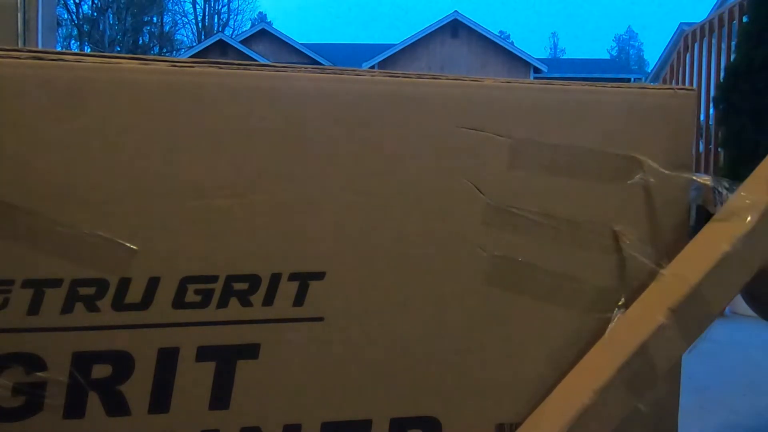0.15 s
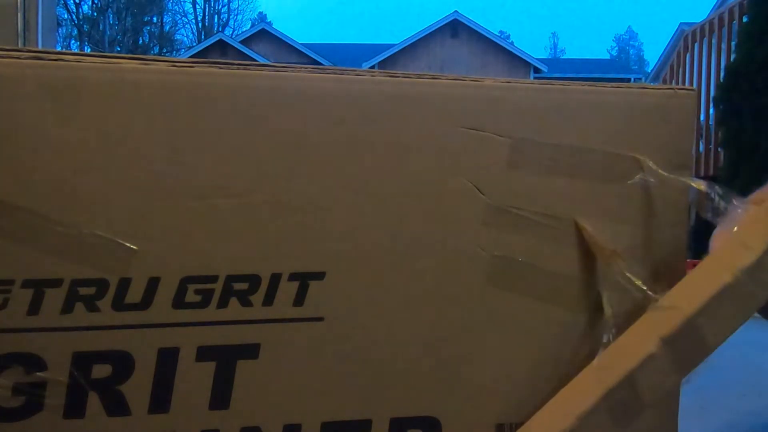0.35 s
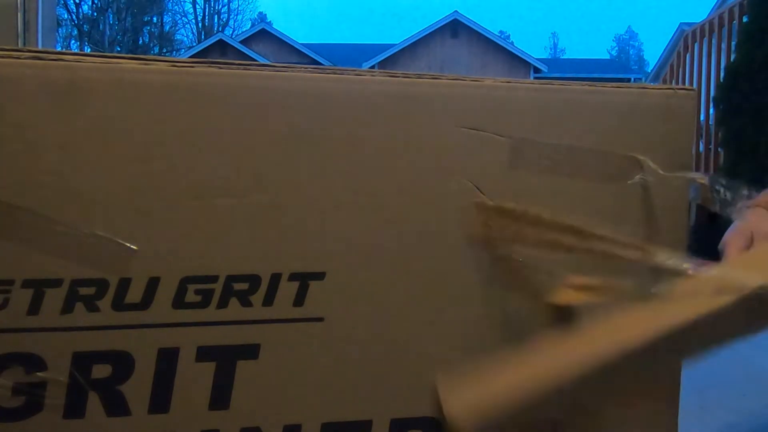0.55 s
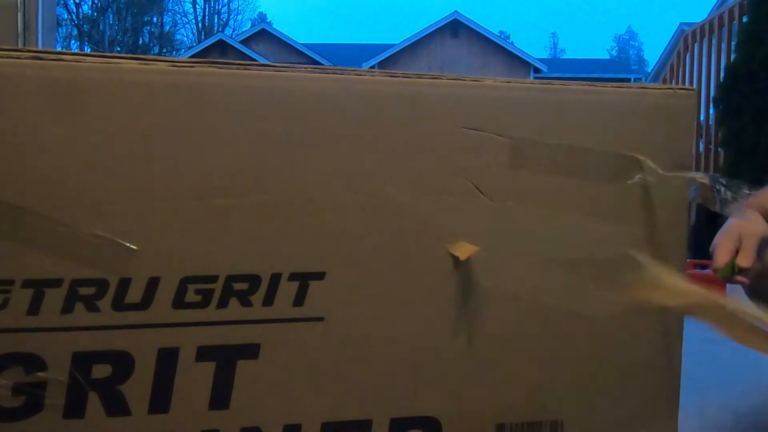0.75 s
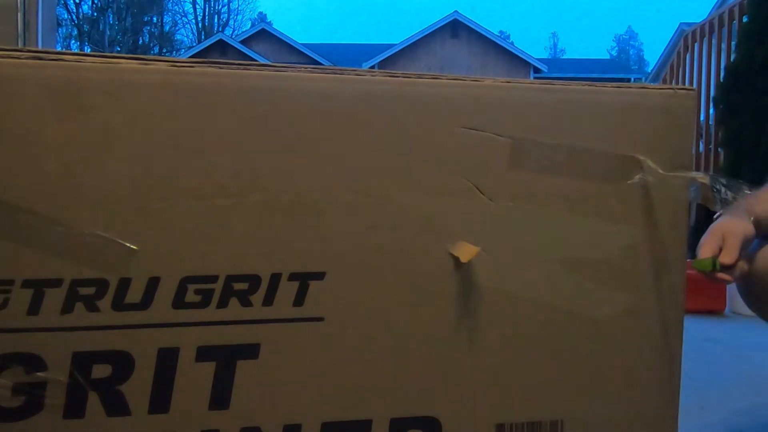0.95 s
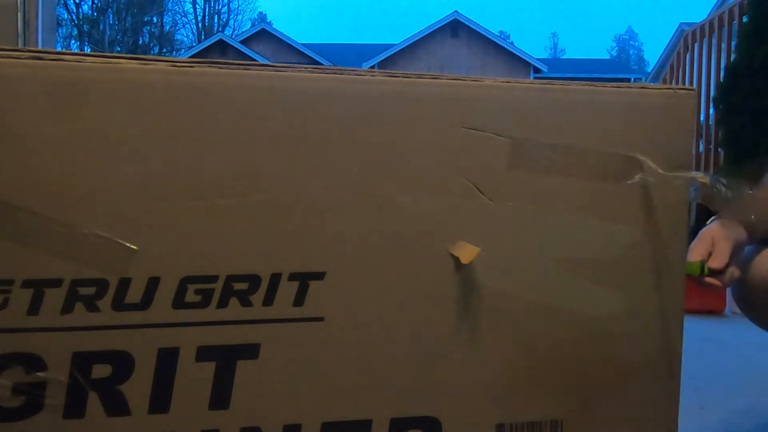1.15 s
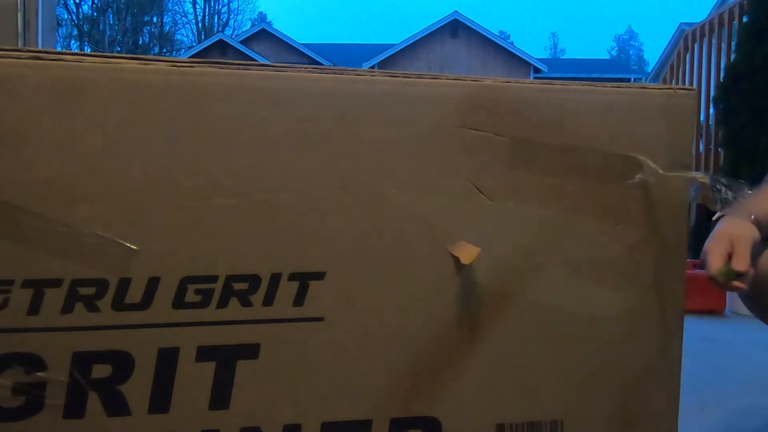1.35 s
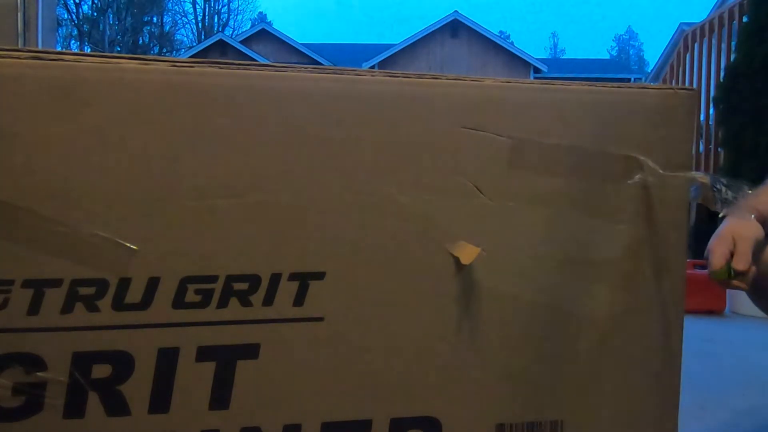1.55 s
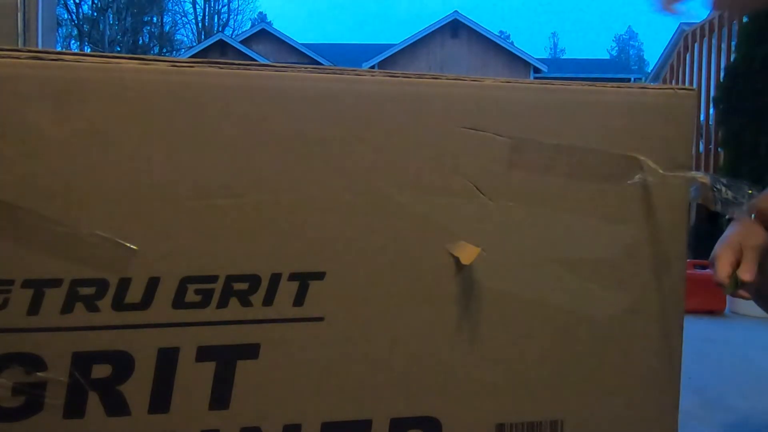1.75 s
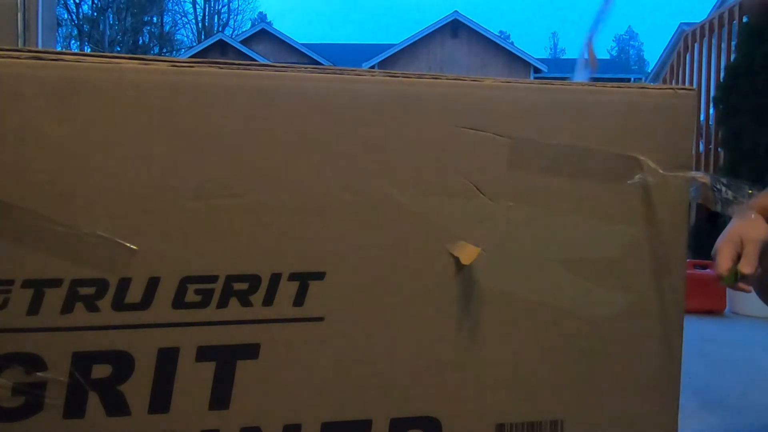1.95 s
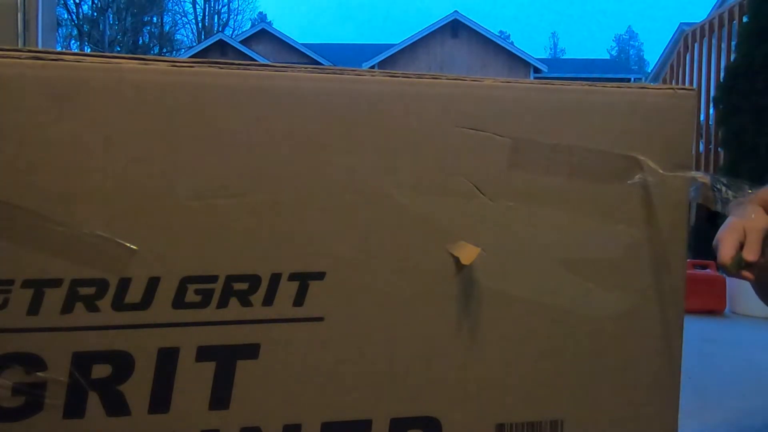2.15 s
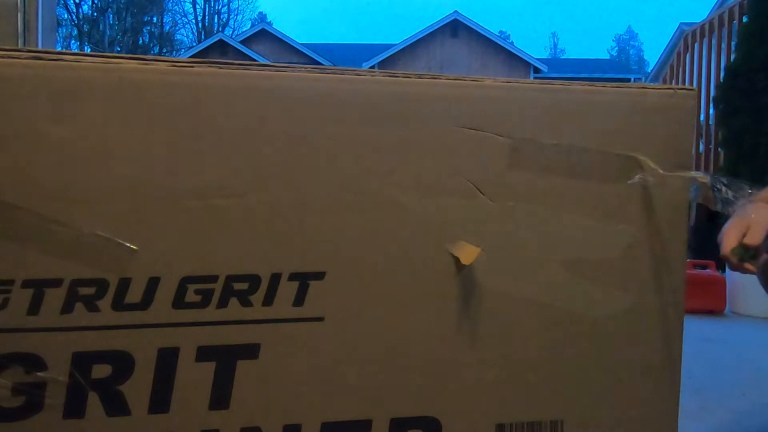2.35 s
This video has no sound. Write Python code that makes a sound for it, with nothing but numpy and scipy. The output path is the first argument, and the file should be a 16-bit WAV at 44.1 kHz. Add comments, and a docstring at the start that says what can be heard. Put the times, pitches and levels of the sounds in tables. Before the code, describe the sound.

Packing tape and a cardboard strip ripped off a big box, then tossed to the ground

```python
"""A machine hums in the background while packing tape and a strip of board are ripped off a large box,
close to a phone, under a roof. Glue and fibres snap in dense random bursts of noise, and the box wall
rings as filtered noise and booms in fading sine tones at each jerk. Loose tape crackles in single ticks,
the strip rustles and then flies with an airy whistle of narrow noise bands.
Last, it lands with a scraping slap; a fading noise tail adds the room to all but the background."""
import sys
import numpy as np
from scipy import signal
from scipy.fft import rfft, irfft, next_fast_len
from scipy.io import wavfile
from scipy.ndimage import uniform_filter1d

SR = 44100
rng = np.random.default_rng(int(sys.argv[2]) if len(sys.argv) > 2 else 0)


def transcribe(u):
    """Save the signal u as a 16-bit wav file named by the first command-line argument.

    u: samples, shape (n,) or (channels, n), limited to [-1, 1]; the rate is SR.
    q: integer samples, one column per channel.
    """
    v = np.clip(np.atleast_2d(u).T, -1, 1)
    q = np.round(v * 32767).astype(np.int16)
    wavfile.write(sys.argv[1], SR, q)


N = 110250


def undb(db):
    """Turn decibels into a plain gain."""
    return 10 ** (np.asarray(db) / 20)


def level(x, db=0):
    """Scale a sound so that its rms (average strength) is db."""
    return x * undb(db) / np.sqrt(np.mean(x ** 2))


def colour(x, table):
    """Make some pitches louder than others, by (f/Hz, gain/dB) points on a log-frequency axis."""
    hz, db = np.array(table).T
    size = next_fast_len(x.shape[-1] + 4096)  # spare room at the end for the filter to ring out
    f = np.arange(size // 2 + 1) * SR / size + 1  # the added 1 Hz avoids log(0)
    gain = undb(np.interp(np.log(f), np.log(np.maximum(hz, 1)), db))
    return irfft(rfft(x, size) * gain, size)[..., :x.shape[-1]]


def band(x, lo_hz, hi_hz):
    """Keep only the pitches between two limits."""
    sos = signal.butter(2, [lo_hz, min(hi_hz, SR * .45)], "band", fs=SR, output="sos")
    return signal.sosfilt(sos, x)


def curve(table, column):
    """Gain over time from a dB column; practically silent (-120 dB) outside the table."""
    rows = np.array(table)
    times, db = rows[:, 0], rows[:, column]
    # a table that reaches the last 0.04 s holds its final level
    after = db[-1] if times[-1] > N / SR - .04 else -120
    return undb(np.interp(np.arange(N) / SR, times, db, left=-120, right=after))


def walk(rate):
    """Slide between random levels, rate new ones a second; typical spread about 0.8."""
    hold = int(SR / rate)
    steps = np.repeat(rng.standard_normal(N // hold + 1), hold)
    return 0.99 * uniform_filter1d(steps, hold)[:N]


def spread(mid, side):
    """Left and right from a middle and an unrelated side signal, leaning a little to the right."""
    # how strongly the side signal is let in: f/Hz, gain/dB
    side_width = [(60, -17), (150, -27.5), (300, -21.5), (600, -6.5), (1300, -3), (2400, -6.5),
                  (4400, -5.5), (8000, 0.5), (15000, 1)]
    # share of the middle that leans to the right: f/Hz, gain/dB
    right_lean = [(60, -33), (250, -18), (600, -14.5), (1500, -13.5), (3000, -18), (9000, -11),
                  (13000, -34.5)]
    side = colour(side, side_width) - colour(mid, right_lean)
    return np.array([mid + side, mid - side])


def background():
    """A machine hum of sine tones wavering in level and pitch, over soft broad noise."""
    # hum tones: f/Hz, rms level/dB
    hum_tones = [(59.2, -67.5), (118.4, -53.5), (188.4, -58), (242.2, -67.5), (382.2, -71)]
    # colour of the soft noise, its overall level is set below: f/Hz, relative level/dB
    air_colour = [(12, -39), (20, -17.5), (90, -9), (154, -16.5), (301, -26), (400, -25.5), (624, -44.5),
                  (1290, -35), (7310, -50.5), (16000, -62)]
    waver_db, waver_hz = 2, 1.5  # size of the random steps, smoothed by walk
    air_db = -54  # rms
    hum = 0
    for hz, db in hum_tones:
        swell = undb(waver_db * walk(11.85))
        turns = np.cumsum(hz + waver_hz * walk(14)) / SR
        hum = hum + level(swell * np.sin(2 * np.pi * turns), db)
    air = level(colour(rng.standard_normal((2, N)), air_colour), air_db)
    return spread(air[0] + hum, air[1])


def snaps(register):
    """Dense snaps of uneven size, each a very short fading noise burst, for middle and side."""
    # colour of a snap: f/Hz, gain/dB
    snap_colour = [(180, -15.5), (280, -1.5), (400, 1), (700, -0.5), (1200, -2), (2000, 0), (3000, 1.5),
                   (5000, -4), (8500, -0.5), (12000, -7.5), (16000, -16)]
    snaps_per_s, fade_t60_s = 5000, 0.0031  # t60: time to fade by 60 dB
    size_spread_db, most_db = 4.5, 6.5  # most snaps are small, the rare big ones are capped
    hit = rng.random((2, N)) < snaps_per_s / SR
    size = undb(np.minimum(size_spread_db * rng.exponential(size=(2, N)), most_db))
    fade = signal.lfilter([1], [1, -1000 ** (-1 / (fade_t60_s * SR))], hit * size)
    bursts = fade * rng.standard_normal((2, N))
    return colour(colour(bursts, snap_colour), register)


def rip():
    """Snapping glue and fibres in four registers that follow the pull, the rustle and the landing."""
    # pull on the tape, one table for each tug and for the flap that follows: t/s, level of the middle
    # register/dB, then relative to it: low body/dB, body/dB, top/dB
    pulls = [
        [(0.0, -42, -14, -1, 0.5), (0.02, -40.5, -0.5, -6, -2), (0.058, -47, -4, -0.5, 0),
         (0.066, -42, 0.5, -3, -1), (0.1, -41, -6.5, -5.5, 1.5), (0.208, -42.5, -1, -4.5, 3),
         (0.234, -32.5, -4.5, -1, -3), (0.272, -29, 1, -4, 2.5), (0.292, -29.5, -3, -1, 0),
         (0.326, -33.5, -1.5, -3, 1), (0.41, -38, -12, -7.5, -1.5)],
        [(0.41, -34, -15, -11.5, -2), (0.444, -26, -3.5, -2.5, -2), (0.504, -22, -2.5, -6, -1.5),
         (0.512, -26.5, -0.5, -3.5, 1.5), (0.59, -21, -13.5, -9.5, -0.5), (0.606, -34, -4.5, -0.5, 6),
         (0.64, -24.5, -11, -5.5, -5), (0.662, -20, -19, -13, 3), (0.68, -34.5, -12, -8.5, 5.5),
         (0.774, -42.5, -10, -5.5, 3.5), (0.785, -49, -15, -8, 8)],
        [(0.785, -43, -16, -8, -4), (0.797, -44, 7, -3, 2), (0.815, -46, -9, 1, 0), (0.831, -45.5, 8.5, 5, 7.5),
         (0.865, -48, 8.5, 5, -1), (0.889, -46.5, -1, -2, -1), (1.009, -56, -3.5, -3.5, -5),
         (1.023, -59, -15, -7, -11), (1.05, -79, -12, 4.5, -19)],
    ]
    # the strip lands and slides: same columns as the pull
    landing = [(2.2246, -64, -4, -2, 4), (2.229, -29.5, -10, -3, -8), (2.26, -25, -9, -2.5, -3.5),
               (2.29, -28.5, -5.5, -1, -4.5), (2.34, -35.5, -3.5, -2, -2.5), (2.42, -42.5, -7.5, -1, -3.5),
               (2.5, -51.5, -7, -4, -5)]
    # strip in the hand and in the air: t/s, middle/dB, low body/dB, body/dB, top/dB (none relative)
    rustle = [(.95, -89, -80, -77, -78), (1.06, -55.5, -73, -57.5, -61), (1.176, -58.5, -70, -61.5, -64),
              (1.326, -69, -73, -64, -83), (1.42, -65, -74, -78, -68), (1.45, -53, -78, -61.5, -60),
              (1.55, -71, -80, -77, -64), (1.64, -65.5, -83, -77, -66), (1.68, -60, -73, -71, -65),
              (1.8, -76.5, -74.5, -69, -79), (1.964, -67.5, -73, -67.5, -79),
              (2.154, -60.5, -65.5, -61, -60.5), (2.225, -56, -65, -57, -60)]
    # the four registers, from deep to bright: f/Hz, gain/dB
    low_register = [(600, 0), (800, -3), (1100, -25)]
    body_register = [(600, -25), (800, -3), (1100, 0), (1500, 0), (2000, -3), (2700, -25)]
    middle_register = [(1500, -25), (2000, -3), (2700, 0), (5000, 0), (6000, -3), (7200, -25)]
    top_register = [(5000, -25), (6000, -3), (7200, 0)]
    swells_per_s, swell_db = 110, 1.0  # fast random swells, mostly shared by the registers
    out, shared_swell = 0, walk(swells_per_s)
    registers = (middle_register, low_register, body_register, top_register)
    for column, register in enumerate(registers, start=1):
        gain = curve(rustle, column)
        for table in (*pulls, landing):
            main = curve(table, 1) if column > 1 else 1
            gain = gain + curve(table, column) * main
        swell = undb(swell_db * (shared_swell + 0.39 * walk(swells_per_s)))
        out = out + level(snaps(register), -2) * gain * swell
    return spread(*out)


def box():
    """The wall rings on its resonances while shaken, and booms in a fading sine at each jerk."""
    # shaking of the wall, one table for each stretch of movement: t/s, level before the trim below/dB
    shaking = [
        [(0.0, -54), (0.012, -50.5), (0.138, -33.5), (0.184, -38.5), (0.254, -27.5), (0.278, -29),
         (0.302, -27.5), (0.39, -33), (0.41, -32)],
        [(0.41, -39), (0.454, -18), (0.482, -25), (0.502, -19), (0.522, -15), (0.556, -20), (0.686, -29.5),
         (0.785, -53)],
        [(0.785, -48.5), (0.831, -26), (0.845, -24.5), (0.915, -40.5), (1.007, -48), (1.023, -68), (1.05, -63)],
        [(2.229, -30.5), (2.291, -28.5), (2.387, -38), (2.469, -47), (2.5, -48)],
    ]
    # wall resonances: f/Hz, width/Hz, level against each other/dB
    resonances = [(40, 14, -9.5), (62, 24, -3.5), (78.7, 20, -1.5), (104.2, 17.4, -2), (130, 14, -2),
                  (177, 41.5, -4), (221.4, 14, -9.5), (288, 45.5, -7.5), (347.5, 29, -8.5)]
    # jerks: t/s, level before rise and fade/dB, f/Hz, rise time constant/s, time to fade by 60 dB/s
    jerks = [(0.092, -30, 95, 0.017, 0.21), (0.234, -15.5, 138.5, 0.0063, 0.11),
             (0.296, -16.5, 114.5, 0.0046, 0.14), (.335, -23.5, 79.6, 0.013, 0.35),
             (.434, -15, 203, 0.0013, 0.043), (0.448, -5.5, 145, .003, 0.041),
             (0.496, -7.5, 135.6, .012, 0.22), (0.574, -16, 67, 0.011, 0.17),
             (.655, -16.5, 60.4, 0.0063, 0.17), (.793, -31, 172, 0.0045, 0.21),
             (0.827, -18.5, 177, 0.0023, 0.03), (0.839, -22, 172, 0.0022, 0.03),
             (.858, -24.5, 172, 0.0023, 0.059), (0.841, -26, 73.4, .008, 0.18),
             (2.227, -24.5, 286, 0.0023, 0.091), (2.245, -24, 190, 0.0034, 0.13),
             (2.269, -20.5, 103.4, 0.011, 0.32)]
    push = rng.standard_normal((2, N))
    wall = 0
    for hz, width, db in resonances:
        wall = wall + undb(db) * level(band(push, hz - width / 2, hz + width / 2))
    out = level(wall, -5.5) * sum(curve(part, 1) for part in shaking)
    t = np.arange(N) / SR
    for start, db, hz, rise, t60 in jerks:
        age = np.maximum(t - start, 0)
        shape = (1 - np.exp(-age / rise)) * 1000 ** (-age / t60)
        out[0] -= undb(db) * np.sin(2 * np.pi * hz * age) * shape
    return spread(*out)


def room(x):
    """Echoes blur into a decaying noise tail with less bass and treble than the direct sound."""
    t60_s, tail_db = 0.52, -12.5
    low_hz, top_hz = 375, 9700
    t = np.arange(SR) / SR
    noise = band(rng.standard_normal((2, SR)), low_hz, top_hz)
    tail = noise * 1000 ** (-t / t60_s) * (t > .004)  # the first echo waits 4 ms
    tail = tail * undb(tail_db) / np.sqrt(np.sum(tail ** 2) / 2)
    mono = x.mean(axis=0, keepdims=True)
    return spread(*signal.fftconvolve(mono, tail, axes=1)[:, :N])


def crackles():
    """Each crackle of tape is a broad tick and a short ring of noise around its pitch."""
    # crackles: t/s, peak before panning/dB, f/Hz, time to fade by 60 dB/s,
    # broad tick against the ring/dB, left minus right/dB
    ticks = [(.0225, -27, 1180, 0.0079, 4, -3), (0.0669, -22, 2250, 0.028, -5, 0),
             (.113, -25, 7360, .01, -13, 2), (.2232, -15, 3550, .015, 3, -5),
             (0.25, -18, 2500, 0.0035, 2, -6), (.366, -21.5, 4100, 0.01, -6, -2),
             (.157, -26, 6000, 0.0054, 1, -2), (.179, -26, 7500, .006, 0, 0),
             (0.403, -21, 8600, 0.0095, -1, -4), (0.44, -21, 2550, 0.013, -7, -6),
             (.585, -9, 5560, .01, -8, -2), (.8262, -22, 1500, .015, -4.5, -2),
             (0.967, -38, 6000, .01, 0, -9), (1.0724, -26.5, 8900, 0.0041, 4, 1),
             (1.0757, -26, 8500, 0.0097, 4.5, -12), (1.1093, -38, 8500, .006, -8, -6),
             (1.306, -48.5, 3130, .008, -8, -5), (1.352, -34, 8250, 0.013, 13, -8.5),
             (1.4266, -30.5, 5100, 0.012, -4, 0), (1.4373, -25.5, 6700, 0.0084, -4.5, -4),
             (1.4466, -29, 6300, 0.011, 4, 0), (1.492, -47.5, 1720, 0.034, -20, 2),
             (1.491, -26, 6230, 0.0068, -3, -1), (1.544, -45, 2970, .005, -11, -1),
             (1.5785, -34.5, 7400, .005, -7, -1), (1.590, -39, 6000, .004, 1.5, 1),
             (1.6555, -31.5, 2900, .005, -0.5, -2.5), (1.888, -42, 6000, .003, 4, -3),
             (1.9445, -46, 6000, .004, -2, -2), (1.952, -52.5, 4000, 0.0044, -4, -6.5)]
    stretch = 1 + .5 / 2  # the ring spans from pitch / stretch to pitch * stretch
    out, size = np.zeros((2, N)), 2048
    for start, db, hz, t60, tick_db, pan_db in ticks:
        burst = rng.standard_normal((3, size)) * 1000 ** (-np.arange(size) / SR / t60)
        burst = burst[0] + .5 * burst[1:]  # shared noise plus a little of its own on each side
        ring = level(band(burst, hz / stretch, hz * stretch))
        ring = ring + level(band(burst, 1800, 10000), tick_db)
        gain = undb(db + np.array([[pan_db], [-pan_db]]) / 2)
        at = int(start * SR)
        out[:, at:at + size] += ring / np.abs(ring).max() * gain
    return out


def flight():
    """Air past the thrown strip whistles: noise narrowed to a few bands."""
    # loudness of the whistle: t/s, gain/dB
    whistle = [(1.8, -89.5), (1.95, -65.5), (2.1, -58), (2.2, -64), (2.23, -52)]
    # whistle resonances: f/Hz, width/Hz, rms level before that gain/dB
    whistle_tones = [(1206, 110, -4.5), (1505, 80, -8.5)]
    push = rng.standard_normal((2, N))
    tones = sum(level(band(push, hz - w / 2, hz + w / 2), db) for hz, w, db in whistle_tones)
    return spread(*tones * curve(whistle, 1))


def scene():
    """Near sounds with their room tail, over the background."""
    near = rip() + box() + crackles() + flight()
    return near + room(near) + background()


def record(dry):
    """The phone dulls the treble and cuts the top steeply."""
    # microphone response: f/Hz, gain/dB
    microphone = [(30, 1), (60, 1), (8800, 0.5), (10000, -7), (13000, -12.5), (16000, -14)]
    top_hz = 15800
    cut = signal.ellip(10, .2, 80, top_hz, fs=SR, output="sos")
    return signal.sosfilt(cut, colour(dry, microphone))


dry = scene()
out = record(dry)
transcribe(out)
```